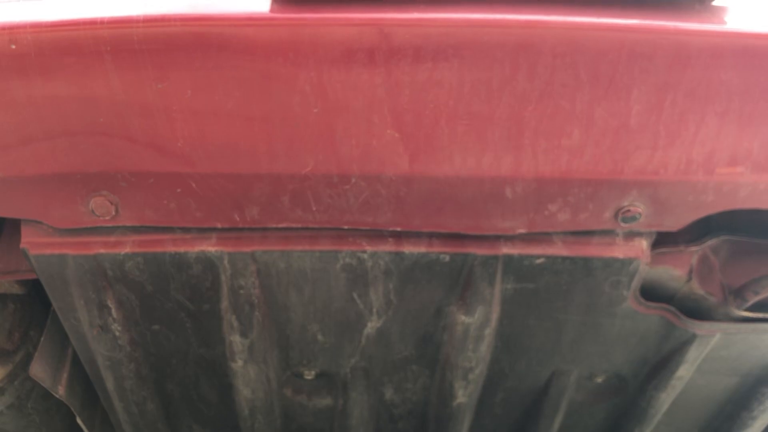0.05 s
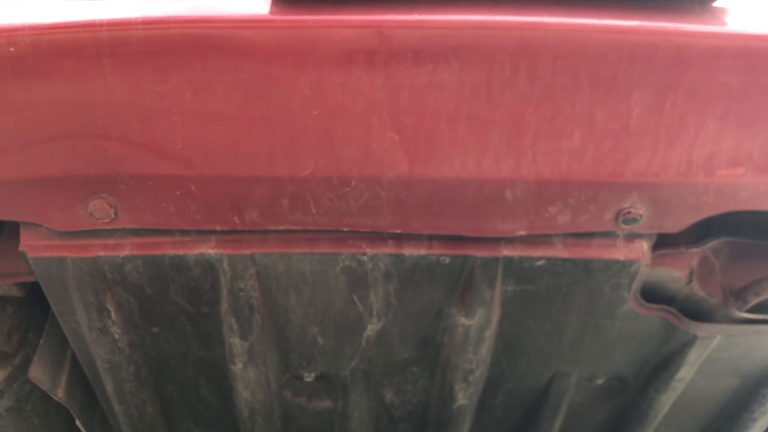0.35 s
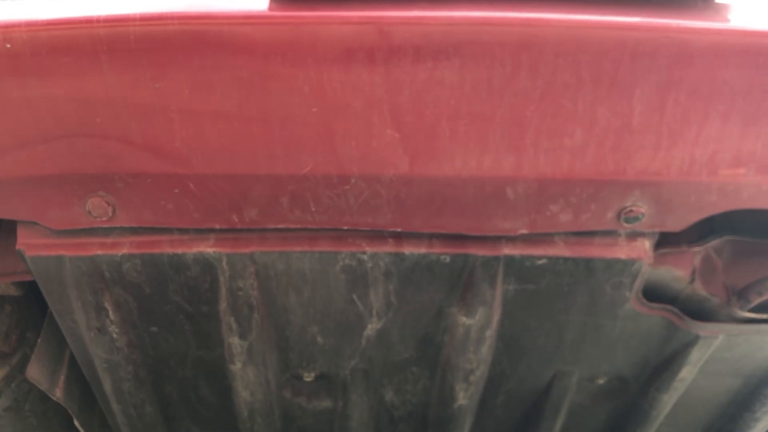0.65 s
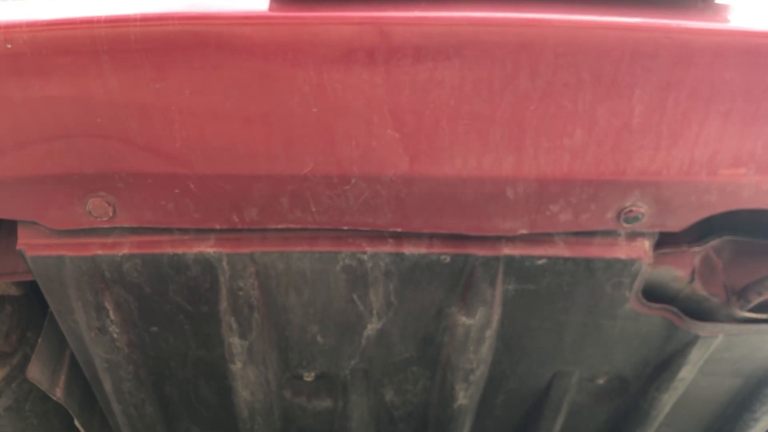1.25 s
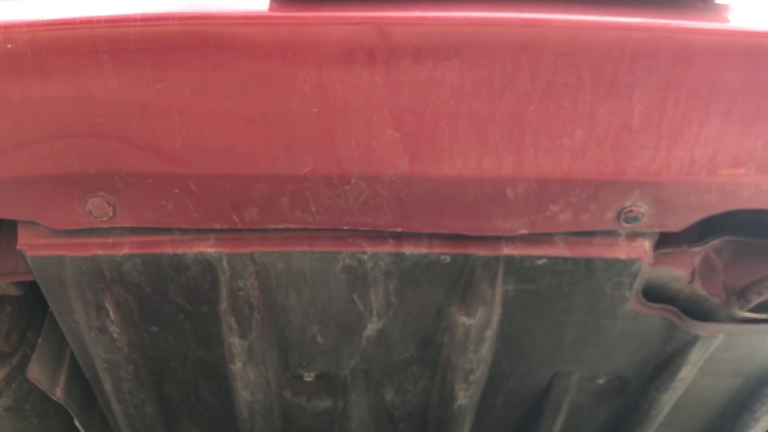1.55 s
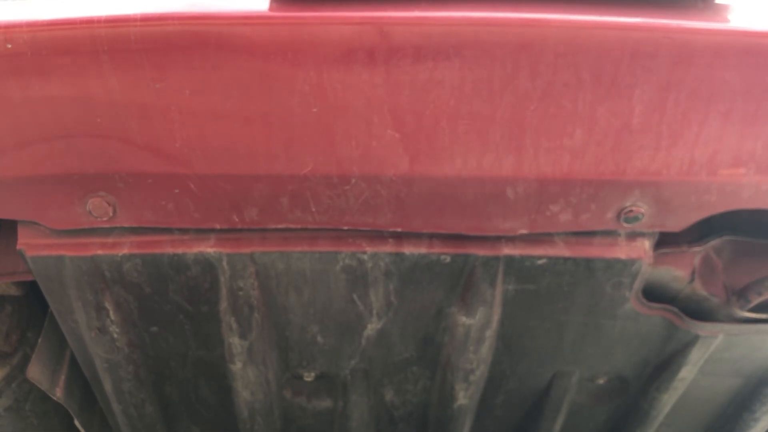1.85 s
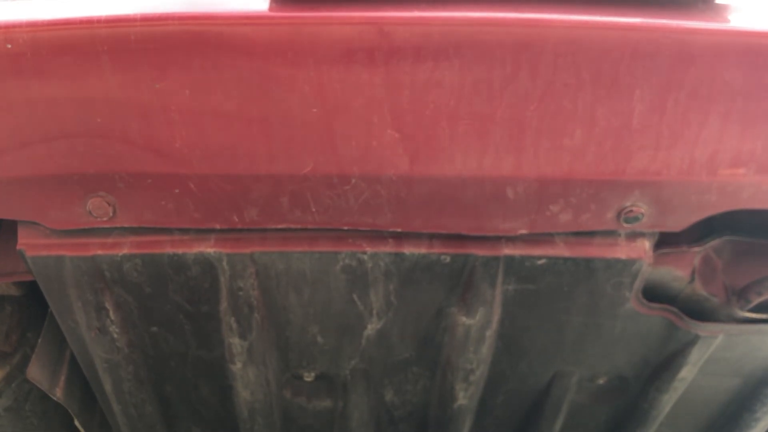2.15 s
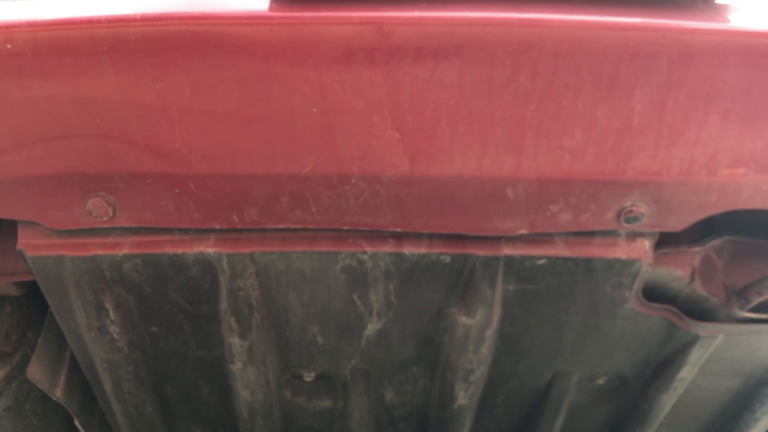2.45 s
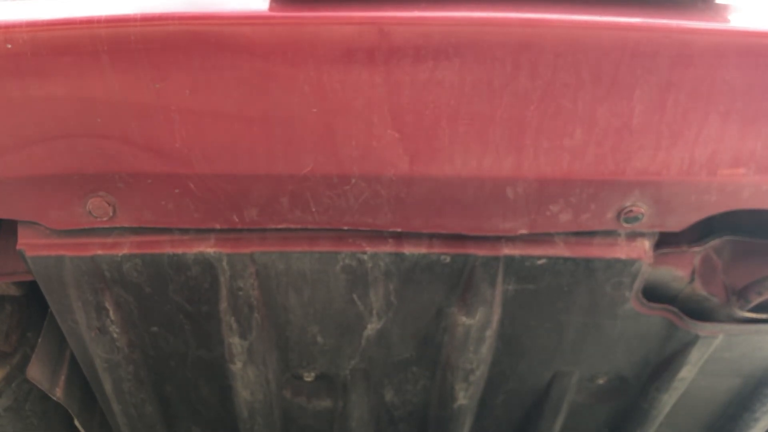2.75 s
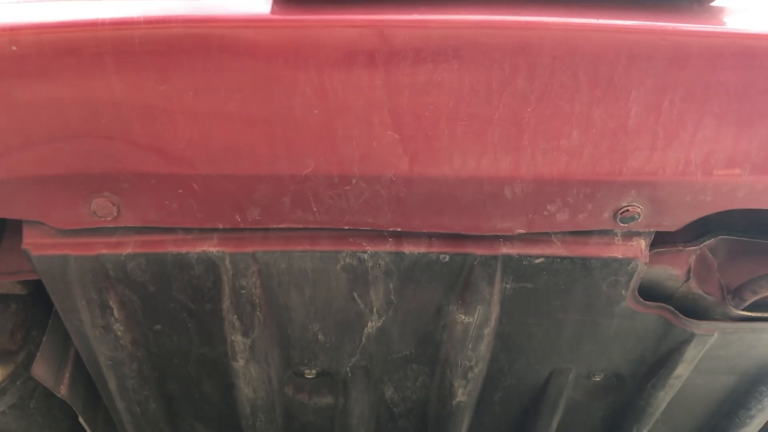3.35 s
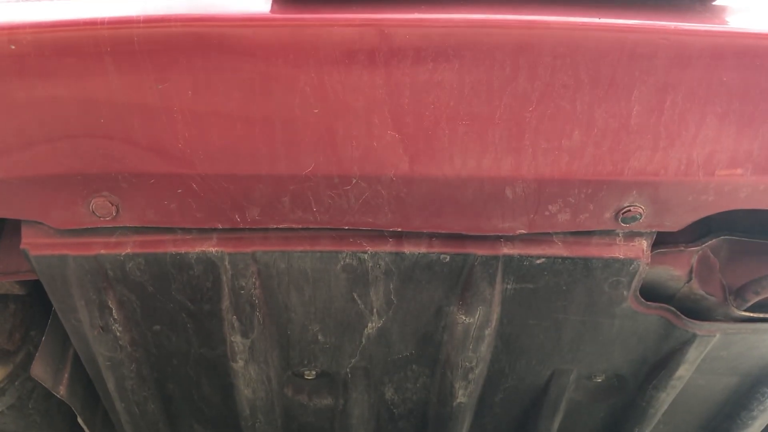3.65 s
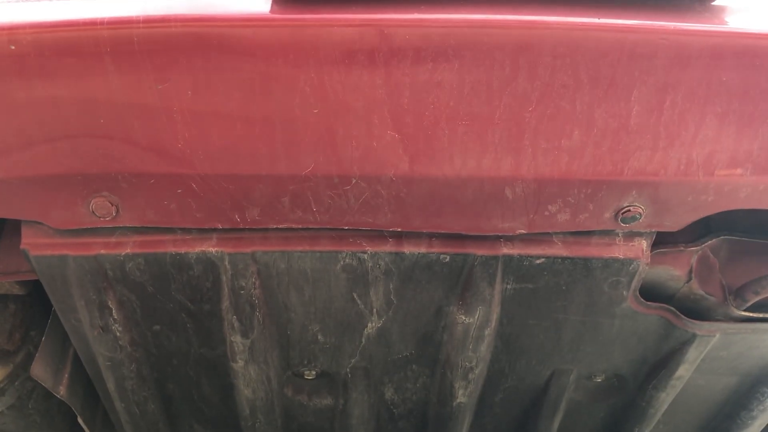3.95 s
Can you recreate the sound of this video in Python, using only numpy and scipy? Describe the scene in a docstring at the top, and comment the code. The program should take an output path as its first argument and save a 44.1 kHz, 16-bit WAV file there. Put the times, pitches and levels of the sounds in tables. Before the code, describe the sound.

A parked car starts up, with the microphone low by its rear end. Faint clicks and dull thuds come first, then a brief whir and whining, metallic cranking, until the engine fires and the exhaust flares, deep and loud.

```python
"""A car engine cold-starts, heard close to the tailpipe. After a few soft bumps and clicks a small
motor whirs up, the starter pinion slams in, and gear teeth grind and ring their housing through five
compression strokes. The engine catches and flares: each firing sends a pulse and a puff of gas down
the pipe, a loud, low rumble that pushes the microphone to its limit."""
import sys
import numpy as np
from scipy import signal
from scipy.fft import rfft, irfft
from scipy.io import wavfile
from scipy.ndimage import map_coordinates

SR = 44100
rng = np.random.default_rng(int(sys.argv[2]) if len(sys.argv) > 2 else 0)


def log_audio(samples):
    """Write samples as a 16-bit WAV file to the path given in sys.argv[1]."""
    # one column per channel
    frames = np.atleast_2d(samples).T
    # limit to full scale, then quantise
    limited = np.clip(frames, -1, 1)
    pcm = np.round(limited * 32767).astype(np.int16)
    wavfile.write(sys.argv[1], SR, pcm)


N = 176400
CATCH_S = 3.598  # the engine takes over from the starter


def amp(db):
    """Decibels to gain."""
    return 10 ** (np.asarray(db) / 20)


def unit(x):
    """Scale to rms 1."""
    return x / np.sqrt(np.mean(x ** 2) + 1e-20)


def clock():
    """Time of each sample."""
    return np.arange(N) / SR


def curves(rows):
    """One automation curve for each column after the time."""
    times, *columns = np.transpose(rows)
    return [np.interp(clock(), times, column) for column in columns]


def wobble(rate):
    """A smooth random curve, rate knots a second."""
    return map_coordinates(rng.standard_normal(int(N * rate / SR) + 4), [clock() * rate])


def filtered(x, response):
    """x times a complex response of frequency."""
    return irfft(rfft(x, 2 * N) * response(np.fft.rfftfreq(2 * N, 1 / SR)))[:N]


def coloured(x, points):
    """x through a minimum-phase EQ of (Hz, dB) points, at rms 1."""
    f, db = np.transpose(points)
    def response(hz):
        gain = amp(np.interp(np.log(hz + 1), np.log(f + 1), db))
        cepstrum = irfft(np.log(gain))
        return np.exp(rfft(np.r_[cepstrum[0], 2 * cepstrum[1:N], np.zeros(N)]))
    return unit(filtered(x, response))


def resonance(f, hz, width):
    """Response of one resonance."""
    return 1j * f * width / (hz * hz - f * f + 1j * f * width)


def modes(f, rows):
    """Response of a bank of resonances."""
    return sum(amp(db) * resonance(f, hz, width) for hz, width, db in rows)


def noise():
    """White noise."""
    return rng.standard_normal(N)


def band(hz, width):
    """Noise around one frequency, with steep skirts."""
    return unit(filtered(noise(), lambda f: resonance(f, hz, width) ** 2))


def strike(s, t60, attack):
    """A quick rise at time s and an exponential decay."""
    t = np.maximum(clock() - s, 0)
    return (1 - np.exp(-t / attack)) * np.exp(-np.log(1000) * t / t60)


def bursts(rows, attack, width_ratio):
    """One decaying hit of band noise for each row."""
    return sum(amp(db) * strike(s, t60, attack) * band(hz, width_ratio * hz) for s, db, hz, t60 in rows)


def pulses(turns, scatter_db, jitter_s):
    """One uneven impulse for each whole turn."""
    at = np.flatnonzero(np.diff(np.floor(turns)))
    size, shift = np.sqrt(3) * rng.uniform(-1, 1, (len(at), 2)).T
    at = np.clip(at + shift * jitter_s * SR, 0, N - 1).astype(int)
    return unit(np.bincount(at, amp(scatter_db * size), N))


# Outdoor bed EQ (frequency [Hz], gain [dB])
AIR_EQ = [(15, -65), (25, -7), (59, 1.5), (101, 0.5), (221, -2), (253, -7.5), (289, -1), (313, -10),
          (368, -8.5), (399, -12), (598, -16.5), (1110, -13.5), (1450, -21), (2360, -28), (15500, -51)]
# Faint steady tones (frequency [Hz], level [dB])
HUM_TONES = [(290.7, -65), (366.1, -62.5), (732, -73), (2315, -75.5)]
def outdoor_air():
    """A dark bed of air with a faint hum."""
    hum = sum(amp(db) * unit(np.sin(2 * np.pi * hz * clock() + 0.49 * wobble(9.7)))
              for hz, db in HUM_TONES)
    return amp(-49 + 0.41 * wobble(8.17)) * coloured(noise(), AIR_EQ) + hum


# High squeaks (time [s], level [dB], centre [Hz], t60 [s])
SQUEAK_CUES = [(.003, -57.5, 7700, 0.17), (.455, -58, 9700, 0.088)]
def squeaks():
    """Faint, thin squeaks of narrow noise."""
    return bursts(SQUEAK_CUES, attack=0.0033, width_ratio=0.23)


# Resonances of the car's trim (frequency [Hz], width [Hz], gain [dB])
TRIM_MODES = [(2460, 39, 3.5), (3090, 29, -0.5), (3810, 67, -11), (4440, 62, -10), (5600, 28, -19),
              (6300, 54, -4), (6760, 83, -7), (7430, 58, -2), (7670, 30, -2)]
def trim_ring(hz):
    """The tone of a click: band noise coloured by the trim."""
    return unit(filtered(band(hz, hz), lambda f: .5 + amp(-1) * np.abs(modes(f, TRIM_MODES))))


# Small clicks (time [s], level [dB], centre [Hz], t60 [s])
CLICK_CUES = [(.08, -58.5, 4900, 0.089), (0.224, -60, 4800, 0.47), (0.73, -43, 6560, 0.023),
              (.764, -44, 835, 0.15), (.77, -55, 3000, .08), (.794, -53.5, 3120, 0.24),
              (0.824, -40, 5560, 0.12), (0.845, -43, 4650, 0.096), (1.003, -45, 3250, 0.083),
              (1.367, -55, 7000, 0.028), (1.758, -55.5, 2580, 0.12), (1.865, -53.5, 2750, .11),
              (1.91, -44, 3800, 0.076), (1.91, -41.5, 1700, 0.14), (2.06, -60.5, 4500, .08),
              (2.233, -67, 3470, .15), (2.345, -66, 7000, 0.078), (2.39, -53, 6000, 0.068)]
# Dull scuffs (time [s], level [dB], t60 [s])
SCUFF_CUES = [(0.218, -44.5, 0.25), (.57, -52.5, 0.22), (0.762, -42.5, 0.16), (.791, -46, 0.2),
              (0.841, -45, 0.074), (1.48, -70, .15), (1.645, -69, .1), (1.86, -43, 0.11),
              (1.909, -45, 0.21), (2.236, -47.5, 0.57)]
def handling():
    """Handling clicks and scuffs, made grainy by a fast level flutter."""
    clicks = sum(amp(db) * strike(s, t60, 0.0014) * trim_ring(hz) for s, db, hz, t60 in CLICK_CUES)
    scuffs = sum(amp(db) * strike(s, t60, 0.0037) for s, db, t60 in SCUFF_CUES) * band(670, width=800)
    return (clicks + scuffs) * amp(2.3 * wobble(350))


# Soft bumps (time [s], level [dB], pitch [Hz], t60 [s])
BUMP_CUES = [(.245, -30.5, 103, 0.1), (0.539, -35.5, 82, 0.19), (0.574, -34.5, 173, 0.2),
             (.618, -30, 131, 0.083), (0.758, -29.5, 178, 0.2), (0.792, -33, 92, 0.13),
             (0.842, -26.5, 157, 0.056), (1.277, -31, 80, 0.1), (1.643, -24.5, 107, 0.2),
             (1.815, -29.5, 80, 0.095)]
def body_bumps():
    """The car body thuds: a damped low tone with a little noise."""
    out = 0
    for s, db, hz, t60 in BUMP_CUES:
        thud = np.sin(2 * np.pi * hz * (clock() - s)) + 0.44 * band(1.36 * hz, hz)
        out += amp(db) * strike(s, t60, 0.0066) * thud
    return out


# Whir fader (time [s], level [dB])
MOTOR_FADER = [(2.3, -94), (2.335, -56), (2.465, -57), (2.482, -40.5), (2.52, -44.5), (2.55, -48),
               (2.62, -48.5), (2.8, -74)]
# Whir EQ (frequency [Hz], gain [dB])
MOTOR_EQ = [(290, -25), (500, -1), (1030, -1.5), (1180, 3), (1410, -1), (2260, 2), (2720, -12), (3430, -3),
            (6360, -5.5), (7670, -13.5), (15500, -20)]
# Motor resonances (frequency [Hz], width [Hz], gain [dB])
MOTOR_MODES = [(1210, 22, 5.5), (2240, 80, -4), (3430, 250, -12), (4540, 60, -12), (5330, 97, -6),
               (6330, 180, -5), (7040, 60, -2)]
def small_motor():
    """A small motor whirs up ahead of the starter: broad noise with ringing peaks."""
    level_db, = curves(MOTOR_FADER)
    whir = coloured(noise(), MOTOR_EQ)
    ring = unit(filtered(noise(), lambda f: modes(f, MOTOR_MODES)))
    return amp(level_db) * (clock() > MOTOR_FADER[0][0]) * (whir + amp(-3.5) * ring)


# Starter gear speed (time [s], tooth rate [Hz])
TOOTH_RATE = [(2.62, 2700), (2.68, 3150), (2.715, 3430), (2.76, 3490), (2.81, 3250), (2.84, 3350),
              (2.905, 4000), (2.955, 3378), (3.04, 2850), (3.1, 4086), (3.135, 4667), (3.21, 3439),
              (3.25, 3935), (3.293, 4762), (3.375, 3547), (3.455, 4736), (3.52, 3677), (3.58, 4300),
              (3.66, 5687)]
def gear_mesh():
    """Running count of teeth as the gears slow under load and spin up again."""
    tooth_hz, = curves(TOOTH_RATE)
    return np.cumsum(tooth_hz * (1 + .018 * wobble(250))) / SR


def rattle(teeth, teeth_per_impact=24, impact_share=0.094):
    """Uneven tooth impacts in a wash of noise."""
    impacts = pulses(teeth / teeth_per_impact, scatter_db=3, jitter_s=.0007)
    return np.sqrt(impact_share) * impacts + np.sqrt(1 - impact_share) * noise()


# Starter housing resonances (frequency [Hz], width [Hz], gain [dB])
HOUSING_MODES = [(836, 29, 0), (1044, 27, 11), (1266, 21, 2), (1866, 30, 5.5), (2377, 60, 1.5),
                 (3090, 52, -1.5), (3450, 56, -12), (6000, 79, -27), (7520, 67, -13)]
def housing_ring(teeth):
    """Rattling teeth ring the starter housing."""
    return unit(filtered(rattle(teeth), lambda f: modes(f, HOUSING_MODES)))


# Tooth clash EQ (frequency [Hz], gain [dB])
CLASH_EQ = [(180, -57), (300, -12), (468, -24.5), (1050, -4.5), (1300, -4), (1620, -12), (2280, 1.5),
            (2690, -8), (3180, -6.5), (5130, -6.5), (5760, -11), (6250, -6), (15500, -29.5)]
def tooth_clash(teeth):
    """The bright edge of teeth taking up load."""
    return coloured(rattle(teeth), CLASH_EQ)


# Pinion hits (time [s], level [dB], t60 [s])
PINION_CUES = [(2.608, -30, 0.13), (2.618, -18.5, 0.095), (2.646, -10, 0.057)]
def pinion_slam(ring, clash):
    """The pinion engages in three hits that clash the teeth and ring the housing."""
    hits = sum(amp(db) * strike(s, t60, 0.0027) for s, db, t60 in PINION_CUES)
    return hits * (amp(-2.5) * ring + clash)


def gear_tone(turns):
    """A tone roughened by uneven tooth contact."""
    contact = 1 + .85 * (wobble(300) + 1j * wobble(300))
    return unit(np.real(contact * np.exp(2j * np.pi * turns)))


# Free-running gear fader (time [s], level [dB])
SPIN_FADER = [(2.61, -148), (2.63, -39), (2.8, -28), (2.92, -33), (3.1, -32.5), (3.45, -33), (3.58, -28),
              (3.61, -21), (3.66, -24), (3.77, -28), (3.85, -34), (4, -40)]
# Free-running gear EQ (frequency [Hz], gain [dB])
SPIN_EQ = [(24, 19), (40, 2), (143, 3.5), (368, -8.5), (797, -3), (1560, -5), (2330, -1.5), (2510, -3.5),
           (3220, -0.5), (3650, -11.5), (4240, -2.5), (5050, -4.5), (7520, -7.5), (8310, -15),
           (15500, -22.5)]
def free_spin(teeth, fade_s=0.067):
    """Unloaded gears rattle and whine; the whine dies once the engine takes over."""
    level_db, = curves(SPIN_FADER)
    fade = np.clip(1 - (clock() - CATCH_S) / fade_s, 0, 1)
    whine = amp(-13 + 1.6 * wobble(26)) * gear_tone(teeth) * fade
    return amp(level_db) * (coloured(rattle(teeth), SPIN_EQ) + whine)


# Compression strokes (time [s], rise [s], hold [s], load level [dB], clash level [dB])
STROKE_CUES = [(2.616, 0.055, 0.15, -22, -44), (2.876, 0.073, 0.087, -22, -16.5),
               (3.134, 0.013, 0.055, -20, -18.5), (3.297, 0.033, 0.044, -21, -16),
               (3.463, .03, 0.036, -20, -17)]
# Loaded gear tones (pitch [multiple of tooth rate], level relative to load [dB])
WHINE_PARTIALS = [(.25, -8.5), (.33, -15.5), (.4, -15), (.5, -15), (.8, -13.5), (1, -11.5), (1.799, -21.5)]
# Loaded gear EQ (frequency [Hz], gain [dB])
GRIND_EQ = [(24, -33), (40, -20), (120, -44), (235, -9), (342, -35), (417, -12), (577, -14), (838, -0.5),
            (949, -18), (1050, -12), (1190, -7), (1730, -22), (1860, -28), (2010, -13.5), (2390, -10.5),
            (2920, -19), (3390, -8), (5720, -23), (7520, -18), (10100, -47), (15500, -49)]
def cranking(teeth, ring, clash, release_db_per_s=230):
    """Each compression loads the gears: they clash, grind and whine, then let go."""
    t = clock()
    load = bite = 0
    for s, rise, hold, load_db, clash_db in STROKE_CUES:
        grip = amp(load_db) * np.clip((t - s) / rise, 0, 1)
        release = amp(-release_db_per_s * np.maximum(t - s - rise - hold, 0))
        load += grip * release
        take_up = np.clip((t - s) / (0.32 * rise), 0, 1)
        bite += amp(clash_db) * strike(s, t60=0.29, attack=.001) * take_up
    whine = sum(amp(db + 2.96 * wobble(45)) * gear_tone(k * teeth) for k, db in WHINE_PARTIALS)
    grind = amp(-4.5) * coloured(rattle(teeth), GRIND_EQ)
    return load * (grind + amp(-5) * ring + whine) + bite * clash


# Low shakes (time [s], level [dB], centre [Hz], t60 [s])
SHUDDER_CUES = [(2.65, -31, 196, 0.45), (2.7, -30.5, 114, .4), (3.03, -39, 120, 0.35)]
def body_shudder():
    """The body shakes as the engine is dragged round."""
    return bursts(SHUDDER_CUES, attack=0.0092, width_ratio=1.15)


# Boom faders before trim (time [s], order 1 [dB], order 2 [dB], order 3 [dB])
BOOM_FADERS = [(3.6, -42, -14, -45), (3.63, -11, -11.5, -14.5), (3.685, -16, -3.5, -20.5),
               (3.715, -22, -15, -22), (3.74, -12, -5.5, -14.5), (3.785, -15, -13, -17),
               (3.83, -15, -11.5, -16), (3.875, -24, -9, -21), (3.914, -14, -16, -9),
               (3.964, -23, -10, -14), (4, -16, -15, -16.5)]
# Boom trims (order 1 [dB], order 2 [dB], order 3 [dB])
BOOM_TRIMS = [-3, 0, 0.5]
# Random level swing of the boom (time [s], depth [dB])
SPUTTER_DEPTH = [(3.6, 1), (3.7, 0), (3.84, 6.5), (3.9, 0.5), (4, 2.5)]
def exhaust_boom(firings, waver_rad=0.4):
    """The sputtering low end: the first three harmonics of the firing rate."""
    boom = 0
    for order, (db, trim) in enumerate(zip(curves(BOOM_FADERS), BOOM_TRIMS), start=1):
        phase = 2 * np.pi * order * firings + waver_rad * wobble(60)
        boom += amp(db + trim) * np.sqrt(2) * np.sin(phase)
    depth_db, = curves(SPUTTER_DEPTH)
    return boom * amp(depth_db * wobble(90))


def gas_puffs(firings, running):
    """Turbulence that jumps at each firing and decays until the next."""
    return unit(noise() * np.exp(-0.85 * (firings % 1)) * amp(3 * wobble(70)) * running)


# Engine flare (time [s], firing rate [Hz])
FIRING_RATE = [(3.6, 46.2), (3.65, 54), (3.69, 59.2), (3.74, 59.6), (3.78, 66.7), (3.83, 70), (3.88, 74),
               (3.93, 74.3), (3.96, 75.4), (4, 72)]
# Bark and roar fader (time [s], level [dB])
BARK_FADER = [(3.6, -30), (3.618, -26), (3.63, -11.5), (3.66, -9), (3.71, -17), (3.76, -10.5), (3.81, -14),
              (3.87, -15.5), (3.925, -14), (4, -15.5)]
# Tailpipe EQ (frequency [Hz], gain [dB])
PIPE_EQ = [(20, -48), (45, -12), (90, 6.5), (160, -3), (250, 5), (320, -7.5), (385, -15), (455, -9),
           (560, -17), (615, -18), (657, -4.5), (705, -21.5), (770, -8), (900, -34), (1045, -21),
           (1200, -33), (2000, -38), (4000, -44), (15000, -63)]
# Turbulent gas EQ (frequency [Hz], gain [dB])
ROAR_EQ = [(190, -34), (330, 0.5), (381, -11.5), (455, -0.5), (544, -13.5), (660, -4.5), (925, -21.5),
           (1050, -6.5), (1220, -17.5), (2000, -20.5), (2170, -28), (2680, -23.5), (2900, -41), (3200, -29),
           (4010, -32.5), (6390, -35), (15500, -49)]
def exhaust(rise_s=.018):
    """Each firing sends a pulse and a turbulent puff down the pipe, over the boom."""
    firing_hz, = curves(FIRING_RATE)
    level_db, = curves(BARK_FADER)
    running = np.clip((clock() - CATCH_S) / rise_s, 0, 1)
    firings = .5 + np.cumsum(firing_hz * (running > 0)) / SR
    kicks = pulses(firings, scatter_db=4.5, jitter_s=0.00048)
    bark = coloured(kicks + gas_puffs(firings, running), PIPE_EQ)
    roar = amp(-9) * coloured(gas_puffs(firings, running), ROAR_EQ)
    gain = amp(level_db) * np.sqrt(running.mean())  # sets the rms over the running stretch alone
    return running * (exhaust_boom(firings) + gain * (bark + roar))


# Gear rasps (time [s], level [dB], centre [Hz], t60 [s])
RASP_CUES = [(3.629, -18.5, 5800, 0.085), (3.72, -21.5, 3300, 0.1), (3.72, -25.5, 6900, 0.093)]
def overrun_rasp():
    """The gears rasp as the engine overruns the starter."""
    return bursts(RASP_CUES, attack=0.0027, width_ratio=0.63)


# Exhaust bangs (time [s], level [dB], centre [Hz], t60 [s])
BANG_CUES = [(3.63, -13.5, 495, 0.076), (3.723, -20, 260, .06), (3.748, -29, 800, 0.079),
             (3.828, -13, 278, 0.059)]
def hard_firings():
    """Cold cylinders fire hard, in short, punchy bangs."""
    return bursts(BANG_CUES, attack=0.00092, width_ratio=1.6)


def underbody(x):
    """Short reflections between the floor pan and the ground."""
    tail = noise() * strike(0, t60=.09, attack=0.001)
    reflections = signal.fftconvolve(x, tail / np.linalg.norm(tail))[:N]
    wet = amp(-7)
    return (x + wet * reflections) / np.hypot(1, wet)


def scene():
    """The starter is heard under the car, the tailpipe directly."""
    foley = outdoor_air() + squeaks() + handling() + body_bumps()
    teeth = gear_mesh()
    ring, clash = housing_ring(teeth), tooth_clash(teeth)
    starter = pinion_slam(ring, clash) + free_spin(teeth) + cranking(teeth, ring, clash)
    under_car = underbody(small_motor() + starter + body_shudder() + overrun_rasp())
    return (foley + under_car + exhaust() + hard_firings())[None]


def record(dry, low_cut_hz=27, ceiling=1.01, knee=5, top_hz=15750):
    """The microphone drops the deepest bass, rounds off the loudest peaks and cuts the top treble."""
    x = filtered(dry[0], lambda hz: 1 - 1 / (1 + (hz / low_cut_hz) ** 8))
    x = x / (1 + np.abs(x / ceiling) ** knee) ** (1 / knee)
    return filtered(x, lambda hz: hz < top_hz)[None]


dry = scene()
out = record(dry)
log_audio(out)
```